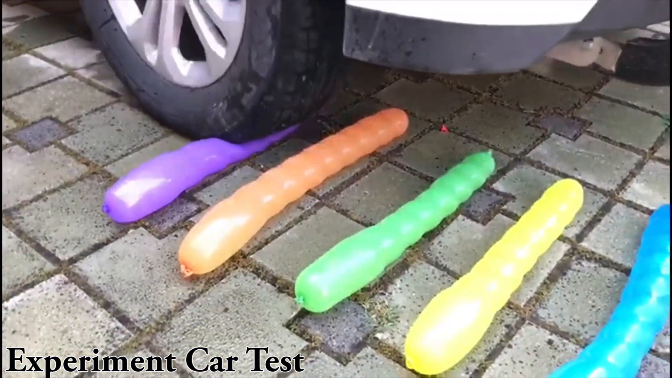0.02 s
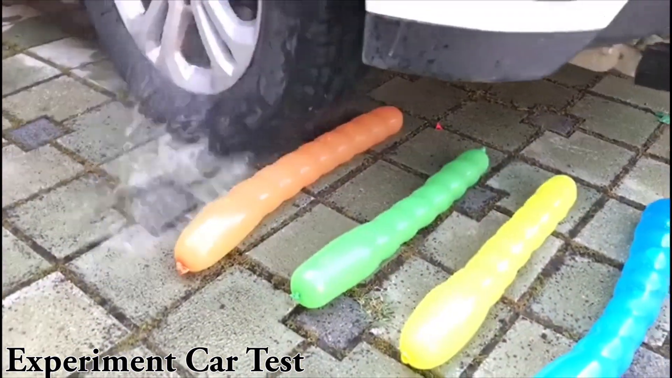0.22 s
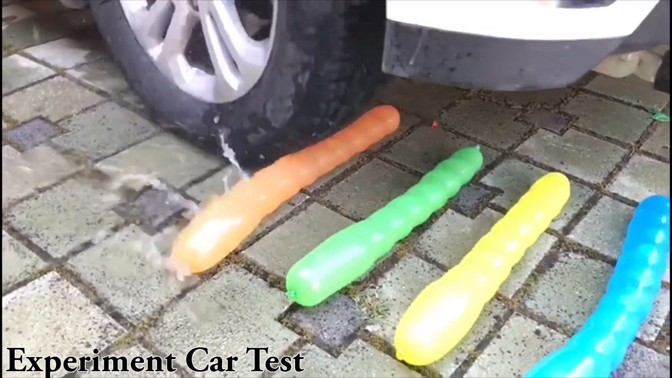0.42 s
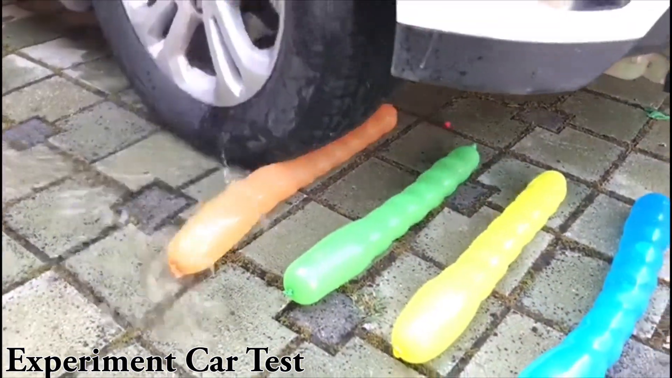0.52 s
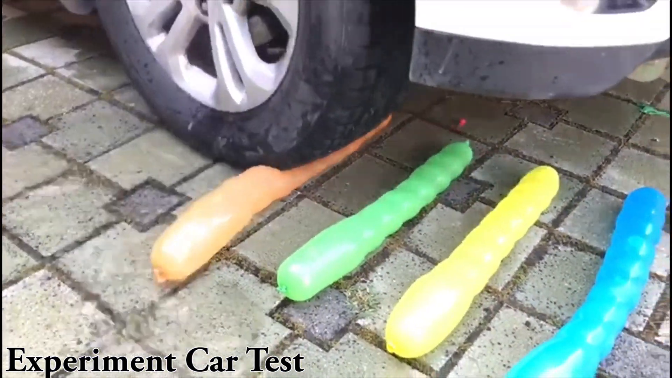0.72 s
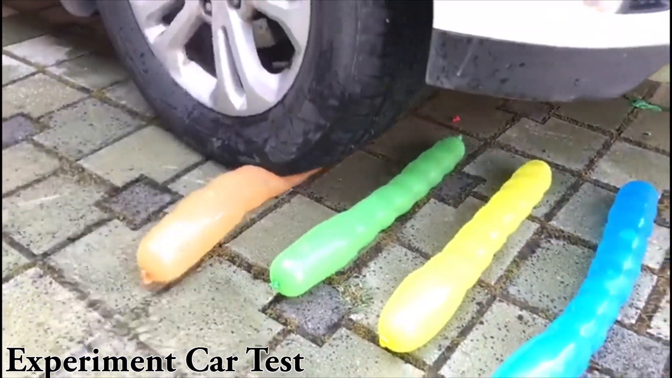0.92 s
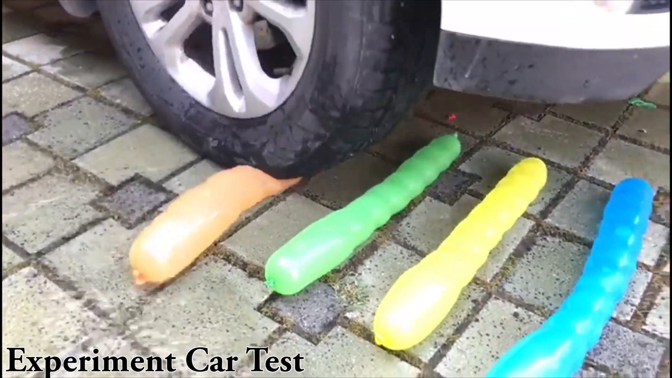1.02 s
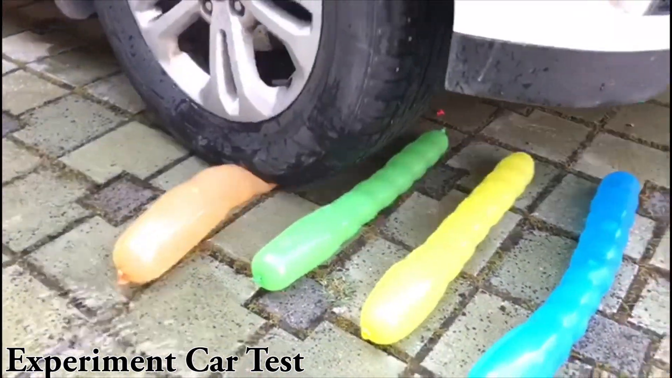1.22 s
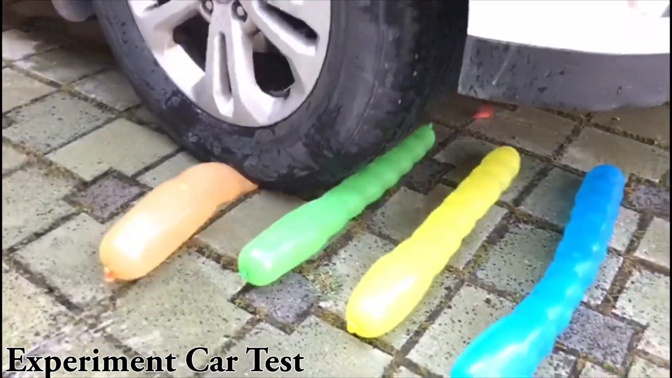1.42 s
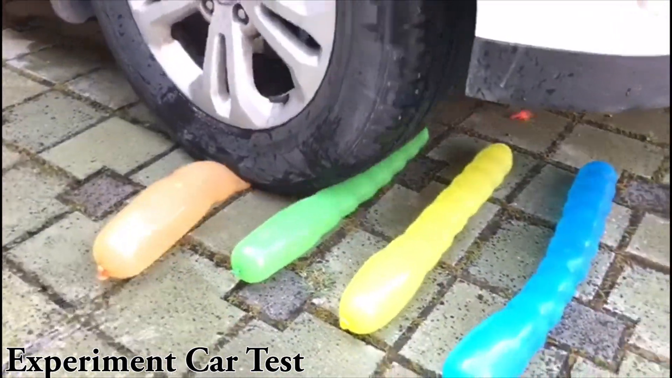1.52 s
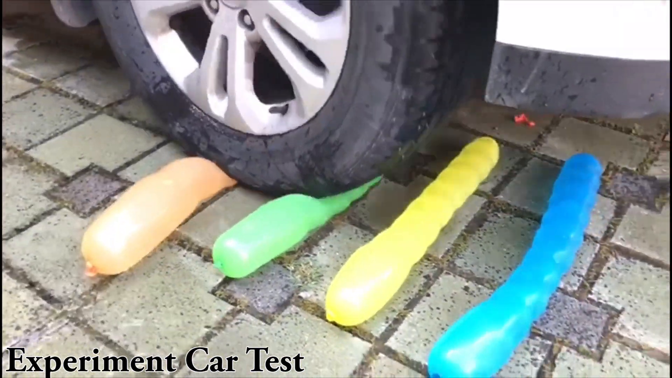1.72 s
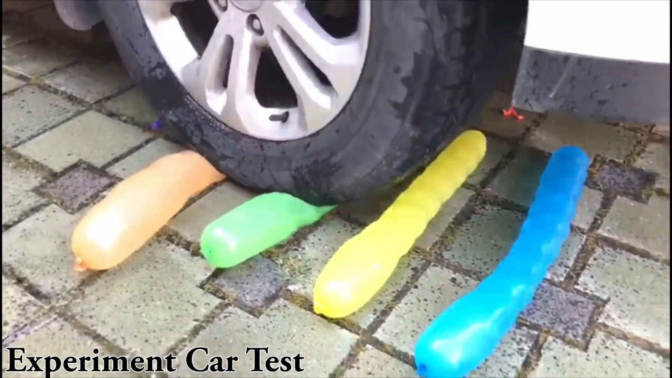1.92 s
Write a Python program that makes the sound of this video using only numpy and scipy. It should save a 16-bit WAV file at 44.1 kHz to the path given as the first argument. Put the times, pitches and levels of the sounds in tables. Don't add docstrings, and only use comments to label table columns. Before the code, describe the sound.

Two water balloons burst under a creeping car tyre, a loud ragged snap almost at once and a softer one later, each spraying water; drips and a low rubber groan between, close outdoors, sparrows behind.

```python
import sys
import numpy as np
from scipy import signal
from scipy.io import wavfile
from scipy.ndimage import uniform_filter1d

SR = 44100
rng = np.random.default_rng(int(sys.argv[2]) if len(sys.argv) > 2 else 0)


def bounce(signal):
    frames = np.transpose(np.atleast_2d(signal))
    limited = np.clip(frames, -1, 1)
    pcm = np.round(limited * 32767).astype(np.int16)
    wavfile.write(sys.argv[1], SR, pcm)


def rack_gain(trim_db):
    fader = np.asarray(trim_db, float)
    return 10 ** (fader / 20)


N = 88200
T = np.arange(N) / SR
# t/s, level/dB
TRICKLE_LEVEL = [(0, -75), (.3, -63), (.5, -65.5), (.85, -65.5), (1.1, -66), (1.45, -62), (1.6, -70.5),
                 (1.85, -60), (2, -59)]


def evened(x):
    return x / np.sqrt(np.mean(x ** 2) + 1e-20)


def coloured(x, points):
    f, db = np.transpose(points)
    bins = np.abs(np.fft.fftfreq(4096, 1 / SR))
    log_gain = np.interp(np.log(bins + 1), np.log(f + 1), db) * np.log(10) / 20
    taps = np.fft.ifft(np.exp(log_gain - 1j * signal.hilbert(log_gain).imag)).real
    if abs(taps[:2048]).sum() <= abs(taps[2048:]).sum():
        taps = np.roll(taps[::-1], 1)
    taps = taps[:2048]
    return signal.oaconvolve(x, taps / np.linalg.norm(taps))[:len(x)]


def add(mix, s, sound):
    part = mix[round(s * SR):][:len(sound)]
    part += sound[:len(part)]


def resonate(x, hz, width_hz):
    turn = np.exp(2j * np.pi * hz * np.arange(len(x)) / SR)
    r = np.exp(-np.pi * width_hz / SR)
    return 2 * (turn * signal.lfilter([1 - r], [1, -r], x / turn)).real


def resonate_twice(x, hz, width_hz):
    return resonate(resonate(x, hz, width_hz), hz, width_hz)


def grains(per_s, spread_db):
    draw = rng.random((N, 3))
    size = rack_gain(spread_db * np.minimum(-np.log(draw[:, 0] + 1e-9), 2.5))
    sign = np.sign(draw[:, 1] - .5)
    return evened(size * sign * (draw[:, 2] < per_s / SR))


def level(curve):
    s, db = np.transpose(curve)
    return rack_gain(np.interp(T, s, db))


def patchy(x, db):
    _, _, z = signal.stft(x, SR, nperseg=512)
    patches = uniform_filter1d(rng.standard_normal(z.shape), 6, 0)
    patches = evened(uniform_filter1d(patches, 5, 1))
    return evened(signal.istft(z * rack_gain(db * patches), SR, nperseg=512)[1][:N])


def bubble(db, start_hz, end_hz, length):
    u = np.arange(0, 1, 1 / (length * SR))
    swell = np.sin(np.pi * u ** 1.43) ** 1.5
    hz = start_hz + (end_hz - start_hz) * u
    return rack_gain(db) * swell * np.sin(2 * np.pi * np.cumsum(hz) / SR)


def outdoors():
    # f/Hz, level/dB
    air_colour = [(88, -29), (150, -0.5), (486, -10), (2420, -14.5), (4090, -12), (11000, -28.5),
                  (13000, -43.5)]
    # t/s, level/dB
    breeze_level = [(0, -0.5), (.2, -3), (.5, 0.5), (.85, 1), (1.0, -1.5), (1.35, -1.5), (1.5, 3), (1.8, 0),
                    (2, -1.5)]
    # f/Hz, width/Hz, level/dB
    idle_modes = [(46.6, 21, -53.5), (77.7, 12, -64), (94.1, 16, -56.5), (130, 13, -64.5), (254, 55, -69.5)]
    air = coloured(patchy(rng.standard_normal(N), 2.0), air_colour)
    idle = np.zeros(N)
    for hz, width_hz, db in idle_modes:
        rumble = resonate_twice(rng.standard_normal(N), hz, width_hz)
        idle += rack_gain(db) * evened(rumble)
    return rack_gain(-58.5) * level(breeze_level) * evened(air) + idle


def chirp(length, top_hz, db):
    low, wobble_depth = .66, 0.018
    u = np.arange(0, 1, 1 / (length * SR))
    arch = np.sin(np.pi * u)
    wobble = np.cos(2 * np.pi * 62 * (u - .5) * length)
    hz = top_hz * (low + (1 - low) * arch ** .7 + wobble_depth * wobble * (1 - arch))
    legs = rack_gain(-5 * (1 - arch)) * arch ** .3
    return rack_gain(db + 3.5 + 5.1 * wobble) * legs * np.sin(2 * np.pi * np.cumsum(hz) / SR)


def yard_echo():
    echo_db, t60, wall_s, wall_db = -1, .4, 0.045, -7.5
    t = np.arange(SR // 2) / SR
    yard = rng.standard_normal(len(t)) * rack_gain(-60 * t / t60) * (t > .004)
    yard *= rack_gain(echo_db) / np.linalg.norm(yard)
    add(yard, wall_s, rack_gain([wall_db]))
    return yard


def sparrows():
    # t/s, length/s, top f/Hz, level/dB
    near_chirps = [(0.052, 0.061, 4100, -57), (0.129, .05, 4096, -55.5), (0.114, 0.089, 5640, -74),
                   (.665, 0.036, 4300, -61), (0.814, 0.053, 4584, -57), (0.873, 0.055, 4080, -53),
                   (0.908, 0.063, 5740, -54), (0.971, 0.046, 5270, -63), (0.997, 0.068, 4534, -57),
                   (1.163, 0.079, 6300, -68), (1.259, 0.07, 5730, -53.5), (1.629, 0.07, 5770, -63)]
    # t/s, level/dB
    flock_level = [(0, -56.5), (.3, -59), (.55, -59.5), (.9, -56), (1.2, -64.5), (1.6, -66), (1.8, -55),
                   (2, -84)]
    # t/s, peak level/dB, start f/Hz, end f/Hz, length/s
    whistle_notes = [(1.649, -60, 5300, 5450, .016), (1.653, -52.5, 5750, 5660, 0.021),
                     (1.652, -55, 3230, 3400, 0.021), (1.677, -53, 5490, 5260, .012),
                     (1.71, -52, 4050, 3950, .02), (1.728, -51.5, 3500, 3700, .02),
                     (1.744, -48.5, 3950, 4300, .015), (1.759, -49.5, 3440, 3440, 0.027),
                     (1.793, -49.5, 4126, 3925, .026), (1.815, -51.5, 3500, 3380, 0.015),
                     (1.832, -55, 3800, 4120, 0.013), (1.981, -52, 3950, 4090, 0.0091)]
    near, flock, notes = np.zeros(N), np.zeros(N), np.zeros(N)
    for s, *row in near_chirps:
        add(near, s, chirp(*row))
    for at, long, pitch, size in rng.random((400, 4)):
        add(flock, at * N / SR, chirp(0.02 + 0.038 * long, 3600 + 1600 * pitch ** 1.5, -10 * size))
    for s, *row in whistle_notes:
        add(notes, s, bubble(*row))
    husk = 1 + .7 * evened(uniform_filter1d(rng.standard_normal(N), 60))
    birds = husk * near + rack_gain(-4.0) * level(flock_level) * evened(flock)
    whistles = husk * notes
    echoes = signal.oaconvolve(birds + rack_gain(-3.0) * whistles, yard_echo())[:N]
    return rack_gain(-4) * (birds + whistles) + echoes


def patter():
    landing_span = .54, 1.0
    drops = resonate_twice(grains(1500, 3.5), 8000, 7000)
    landing = np.where(T > landing_span[0], np.interp(T, landing_span, (1, .3)), .3)
    return rack_gain(3) * level(TRICKLE_LEVEL) * evened(drops) * landing


def trickle():
    out = np.zeros(N)
    for at, pitch, size, cycles in rng.random((900, 4)):
        hz = 550 * 4.5 ** pitch ** 1.5
        add(out, at * N / SR, bubble(-14 * size, hz, hz * 1.15, (3 + 7 * cycles) / hz))
    return level(TRICKLE_LEVEL) * evened(out)


def bubbles():
    # t/s, peak level/dB, start f/Hz, end f/Hz, length/s
    thumps_and_bubbles = [(0.212, -33, 130, 120, 0.013), (.221, -28, 600, 640, .011),
                          (.2225, -23, 960, 990, .011), (0.212, -33, 299, 420, 0.0084),
                          (0.262, -42, 1002, 1110, 0.027), (0.277, -38.5, 690, 810, 0.014),
                          (1.3748, -20, 818, 880, .004), (1.375, -28.5, 293, 320, 0.0097),
                          (.653, -49, 2050, 3000, 0.0048), (0.669, -45.5, 1800, 3600, 0.006),
                          (.682, -50, 2200, 2400, .006), (0.694, -52, 1050, 1150, .006),
                          (0.72, -48, 1400, 1600, .01), (0.247, -24.5, 2410, 2600, 0.0081),
                          (0.329, -40, 1326, 1530, .016), (0.444, -46, 1670, 1910, .01),
                          (0.458, -46, 640, 750, 0.011), (0.464, -46.5, 1175, 1325, 0.017),
                          (0.807, -49.5, 1100, 1020, 0.014), (1.561, -35.5, 587, 720, 0.0062),
                          (1.604, -49, 1850, 1940, 0.02), (1.624, -50, 2560, 2750, .007),
                          (1.755, -50, 1100, 1192, 0.006), (1.794, -30, 713, 1050, 0.014),
                          (1.805, -40.5, 1136, 1380, 0.011), (1.889, -37, 890, 940, 0.0076),
                          (1.895, -29.5, 990, 1017, 0.016)]
    out = np.zeros(N)
    for s, *row in thumps_and_bubbles:
        add(out, s, bubble(*row))
    return out


def tears():
    # t/s, peak level/dB, centre f/Hz, t60/s
    rips = [
        (0.2146, -30, 4000, .02),
        (0.2160, -10, 3520, 0.028),
        (0.219, -15, 4000, 0.035),
        (.2250, -6.5, 5600, 0.021),
        (0.2264, -13.5, 6450, 0.044),
        (0.2306, -14, 7360, 0.066),
        (.2370, -25.5, 5000, .05),
        (1.3749, -15, 3840, 0.022),
        (1.3773, -19.5, 7000, 0.051),
        (1.3820, -24.5, 5000, 0.045),
    ]
    # f/Hz, level/dB
    tear_colour = [(40, -8), (260, -13.5), (1000, -6.5), (3270, -3), (5060, -4.5), (7100, -1), (11500, -8),
                   (13000, -14.5)]
    focus_db, focus_octaves = 1.5, .8
    out, t, f = np.zeros(N), np.arange(4000) / SR, np.geomspace(60, 13000, 30)
    for s, db, hz, t60 in rips:
        bump = focus_db * np.exp(-(np.log2(f / hz) / focus_octaves) ** 2)
        attack = np.minimum(t / 0.00026, 1)
        rush = rng.standard_normal(len(t)) * attack * rack_gain(db - 60 * t / t60)
        add(out, s, coloured(rush, np.transpose([f, bump])))
    return coloured(out, tear_colour)


def ticks():
    # t/s, peak level/dB, centre f/Hz
    strikes = [(0.2163, -7, 3380), (.2267, -4.5, 6160), (1.3756, -8.5, 3460), (0.5718, -30.5, 6600),
               (0.5795, -37, 3500), (0.5991, -20, 5800), (.6435, -47, 8800), (.5905, -39, 8600),
               (.623, -44, 8700), (.679, -42, 10500), (.689, -47, 9000), (.745, -48, 10000),
               (0.7485, -34.5, 6600), (.79, -44.5, 5500), (.83, -47, 8000), (.847, -49, 8230),
               (.7668, -37, 1970), (1.8976, -41.5, 1700), (1.982, -47, 1500)]
    relative_width, tail_db, tail_t60 = 0.63, -12.5, 0.018
    out, t = np.zeros(N), np.arange(4000) / SR
    for s, db, hz in strikes:
        width_hz = relative_width * hz
        click = resonate_twice((t == 0) * 1., hz, width_hz)
        tail = evened(resonate_twice(rng.standard_normal(len(t)), hz, width_hz))
        tail = tail * rack_gain(tail_db - 60 * t / tail_t60)
        add(out, s, rack_gain(db) * (click / abs(click).max() + tail))
    return out


def slaps():
    # t/s, peak level/dB, centre f/Hz, width/Hz, t60/s
    splashes = [(.2185, -21.5, 11000, 2000, .04), (.26, -27, 4900, 1500, .015),
                (.2745, -28.5, 2600, 1500, .02), (.281, -33, 4900, 640, 0.056),
                (0.46, -38, 3700, 2500, .025), (.347, -39, 5500, 2500, .02), (0.3, -38.5, 4800, 5400, .03),
                (.368, -37, 3900, 3970, .02), (1.965, -53, 6100, 900, 0.064), (1.966, -55, 3500, 900, .05),
                (1.905, -65, 7200, 2000, 0.034), (.66, -54.5, 5000, 7000, .3), (1.53, -39, 710, 1050, 0.14),
                (1.5272, -35.5, 2500, 3700, 0.12), (1.376, -31.5, 167, 470, 0.12),
                (1.799, -45.5, 960, 800, 0.28)]
    out, t = np.zeros(N), np.arange(4000) / SR
    for s, db, hz, width_hz, t60 in splashes:
        splash = evened(resonate_twice(rng.standard_normal(len(t)), hz, width_hz))
        attack = np.minimum(t / 0.00021, 1)
        add(out, s, splash * attack * rack_gain(db - 0.5 - 60 * t / t60))
    return out


def spray():
    # t/s, rise/s, level/dB, t60/s
    sheets = [
        (0.219, 0.016, -25, 0.17),
        (0.249, 0.023, -37.5, 0.38),
        (0.334, 0.029, -46, 0.21),
        (.42, 0.041, -55.5, 0.65),
        (1.376, 0.0047, -25.5, 0.11),
        (1.409, 0.024, -39, 0.08),
        (1.435, 0.035, -52.5, 1.3),
    ]
    # f/Hz, level/dB
    spray_colour = [(88, -39.5), (150, -22), (400, -16), (1100, -5.5), (6280, -5), (11200, -14),
                    (12300, -19.5), (13000, -80)]
    shape = np.zeros(N)
    for s, rise, db, t60 in sheets:
        decay = rack_gain(db - 60 * np.maximum(T - s - rise, 0) / t60)
        shape += np.clip((T - s) / rise, 0, 1) * decay
    drops = .5 * grains(6000, 4) + 0.65 * rng.standard_normal(N)
    return coloured(shape * patchy(drops, 1.3), spray_colour)


def plinks():
    # t/s, peak level/dB, f/Hz, t60/s
    puddle_drops = [(0.564, -47.5, 5800, 0.021), (0.668, -45, 1670, 0.028), (0.7024, -38, 1962, 0.06),
                    (0.7669, -39, 1510, 0.033), (.767, -41.5, 2130, 0.053), (0.767, -45, 2580, 0.045),
                    (.768, -49.5, 922, 0.16), (0.832, -42, 1295, 0.042), (1.5261, -27.5, 1930, 0.025),
                    (1.5289, -31, 992, 0.026), (1.5635, -33, 763, 0.046), (1.9, -38.5, 565, 0.058),
                    (1.529, -41, 420, .07), (1.531, -41, 566, 0.055), (1.897, -44.5, 352, 0.072),
                    (.6, -48, 291, 0.093)]
    pitch_rise = 0.07
    out, t = np.zeros(N), np.arange(4000) / SR
    flutter = rack_gain(2.0 * evened(uniform_filter1d(rng.standard_normal((20, len(t))), 90)))
    for (s, db, hz, t60), shake in zip(puddle_drops, flutter):
        ring = np.sin(2 * np.pi * hz * (t + pitch_rise * t ** 2 / t60))
        splash = resonate(rng.standard_normal(len(t)), hz, 0.71 * hz)
        splash = evened(resonate(splash, hz, 0.67 * hz))
        envelope = np.minimum(t * hz, 1) * rack_gain(db - 60 * t / t60)
        add(out, s, shake * envelope * (ring + 0.56 * splash))
    return out


def wobbles():
    # t/s, peak level/dB, start f/Hz, end f/Hz, length/s
    groans = [
        (.915, -29, 118.5, 75.8, 0.073),
        (.912, -32, 192, 212, 0.049),
        (.92, -40, 341, 332, 0.059),
        (.98, -44, 335.5, 344, 0.043),
        (1.0, -30, 126.7, 104.4, 0.025),
        (1.025, -38, 80, 70, 0.043),
        (1.1, -37.5, 75.4, 60, 0.029),
    ]
    out = np.zeros(N)
    for s, *row in groans:
        add(out, s, bubble(*row))
    return out


def gust():
    # t/s, level/dB
    slosh_level = [(.912, -43), (1.0, -37), (1.06, -46), (1.15, -50), (1.3, -57.5)]
    # f/Hz, level/dB
    slosh_colour = [(18, -39), (30, -8), (129, -3.5), (333, -20), (1500, -43), (1950, -70), (3300, -120)]
    lumps = rack_gain(3.0 * evened(uniform_filter1d(rng.standard_normal(N), 500)))
    slosh = evened(coloured(rng.standard_normal(N), slosh_colour) * lumps)
    on = (T > slosh_level[0][0]) * (T < slosh_level[-1][0])
    return slosh * level(slosh_level) * uniform_filter1d(on * 1., 200)


def scene():
    background = outdoors() + sparrows()
    water = patter() + trickle() + bubbles() + ticks() + slaps() + spray() + plinks()
    rubber = tears() + wobbles() + gust()
    return (background + water + rubber)[None]


def low_pass(x):
    return signal.sosfilt(signal.butter(12, 13490, fs=SR, output="sos"), x)


def record(dry):
    low_cut_hz, ceiling = 33, 1.3
    edge_hz, top_hz, edge_drop_db = 11950, 13600, -32
    low_cut = signal.butter(4, low_cut_hz, "high", fs=SR, output="sos")
    dry = signal.sosfilt(low_cut, dry)
    limited = ceiling * np.tanh(dry / ceiling)
    g = rack_gain(edge_drop_db)
    main = signal.firwin(401, edge_hz, window=("kaiser", 8), fs=SR)
    rest = signal.firwin(401, top_hz, window=("kaiser", 8), fs=SR)
    taps = (1 - g) * main + g * rest
    return low_pass(signal.oaconvolve(limited, taps[None], "same"))


dry = scene()
out = record(dry)
bounce(out)
```